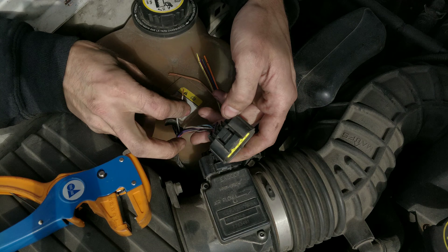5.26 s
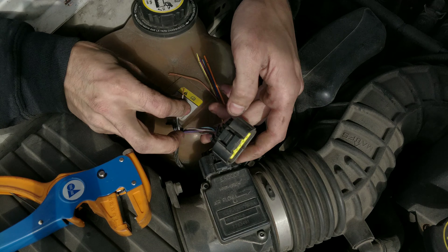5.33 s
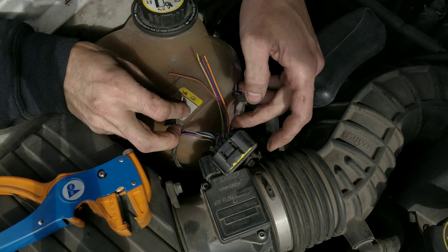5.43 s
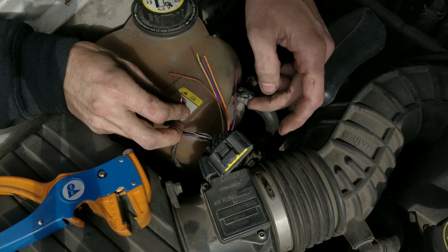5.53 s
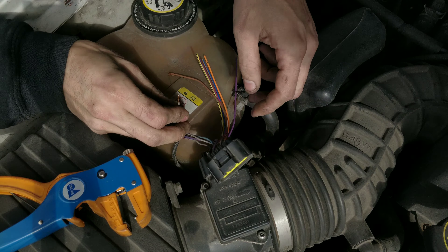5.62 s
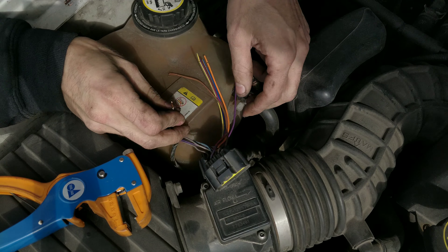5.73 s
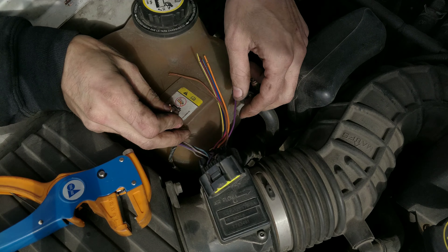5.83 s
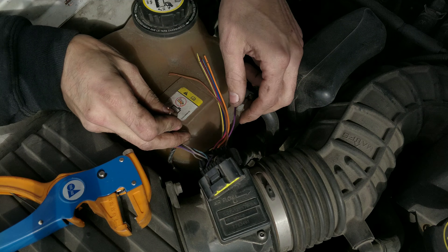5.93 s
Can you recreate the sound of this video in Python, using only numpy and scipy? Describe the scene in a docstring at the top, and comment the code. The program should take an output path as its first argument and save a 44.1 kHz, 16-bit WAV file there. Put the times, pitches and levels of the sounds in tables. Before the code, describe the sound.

An outdoor stereo scene by an open engine bay. A far engine drones low and nearly steady, wavering slightly and strengthening a little towards the end, within dull distant traffic leaning right. Fingers rustle faintly at the start. A short low wind thump hits the right side at 0.75 s, with weaker puffs until about 1.4 s. Close on the left, a wire cutter crunches and snaps loudly at 1.6 s. Small ticks follow around 1.7-2.05 s, then a bright snap with a brief steel ring at 2.29 s. At 2.53-2.6 s comes a fast, loud clatter of jaws and hollow plastic housing, with very short dull echoes. From 3 s only delicate, dry rubbing and tiny ticks remain, busier after 3.9 s. A barely audible thin squeak comes at 5.4 s, soft knocks and a damped metallic clink at 5.76-5.86 s, then a faint jingling drag to the end.

```python
"""Outdoors beside an open engine bay: from the start a far engine drones as three wavering sines
over the filtered noise of traffic, while fingers and sleeves rustle as grains of friction.
Wind puffs as low noise on one port; then, close on the left, a steel hand tool cuts and strips thin wire:
noise bursts make its jaws crunch, snap and tick, decaying modes let the plastic housing knock
and the steel ring. Late on the pivot squeaks as a thin tone and the dragged tool jingles."""
import sys
import numpy as np
from scipy import signal
from scipy.fft import rfft, irfft, next_fast_len
from scipy.io import wavfile

SR = 44100
rng = np.random.default_rng(int(sys.argv[2]) if len(sys.argv) > 2 else 0)


def decibels_to_gain(level_db):
    """Convert a level in decibels to a linear amplitude gain (20 dB per decade)."""
    exponent = np.asarray(level_db, float) / 20
    return 10 ** exponent


def store_wav(level_fs):
    """Save 16-bit WAV to argv[1]."""
    pcm = np.round(np.clip(np.atleast_2d(level_fs), -1, 1) * 32767)
    wavfile.write(sys.argv[1], SR, pcm.T.astype(np.int16))


N = 263277   # samples


def rms_one(x):
    """Scales a signal to a root mean square of 1."""
    return x / np.sqrt(np.mean(x ** 2) + 1e-20)


def in_time(rows):
    """Draws each column after the first as a line through time."""
    seconds, *columns = np.transpose(rows)
    return [np.interp(np.arange(N) / SR, seconds, column) for column in columns]


def coloured(x, points):
    """Shapes the spectrum by (Hz, dB) points, joined over log frequency."""
    size = next_fast_len(N)
    hz = np.maximum(np.arange(size // 2 + 1) * SR / size, 1)
    points_hz, points_db = np.transpose(points)
    gain_db = np.interp(np.log(hz), np.log(points_hz), points_db)
    return irfft(rfft(x, size) * decibels_to_gain(gain_db), size)[..., :N]


def drift(rate_hz):
    """Slow chance of spread 1: noise through two equal poles, drawn at every 40th sample."""
    r = np.exp(-2 * np.pi * rate_hz * 40 / SR)
    noise = rng.standard_normal(N // 40 + 2002)
    slow = signal.lfilter([1], [1, -2 * r, r * r], noise)[2000:]   # skip the settling
    return np.interp(np.arange(N) / 40, np.arange(len(slow)), rms_one(slow))


def ring(push, hz, t60):
    """A damped resonance: a unit click sets a sine ringing that falls 60 dB in t60 seconds."""
    r, w = decibels_to_gain(-60 / (t60 * SR)), 2 * np.pi * hz / SR
    return signal.lfilter([0, np.sin(w)], [1, -2 * r * np.cos(w), r * r], push + 1e-18)


def band(x, low_hz, high_hz):
    """Keeps the band between two frequencies."""
    return signal.sosfilt(signal.butter(2, [low_hz, high_hz], "band", fs=SR, output="sos"), x)


# The far engine, heard nearly level in both ports. Each row: time in seconds, firing rate in Hz,
# drone level in dB, third order level in dB, both before the waver.
ENGINE_COURSE = [(0, 69.58, -36, -55), (1.0, 68.8, -41.5, -59.5), (1.6, 68.76, -37.5, -56),
                 (2.3, 69.48, -33.5, -62.5), (2.8, 69, -37, -63.5), (3.5, 69.5, -33.5, -47.5),
                 (3.85, 69.4, -35, -64.5), (4.6, 69.1, -33.5, -48), (5.1, 70.13, -32.5, -54),
                 (5.3, 70.35, -29.5, -46.5), (5.97, 71.12, -31, -45.5)]


def engine():
    """Three firing orders as sines, the second swelling with the first; the air path makes each waver."""
    firing_hz, drone_db, third_db = in_time(ENGINE_COURSE)
    # the second order gains 1.9 dB per dB of drone
    second_db = -56 + 1.9 * (drone_db - drone_db.mean())
    phase = 2 * np.pi * np.cumsum(firing_hz) / SR
    drone = np.zeros(N)
    for order, level_db in enumerate([drone_db, second_db, third_db], start=1):
        waver = decibels_to_gain(.8 * drift(9))
        turn = .2 * drift(6)   # radians of firing phase
        drone += np.sqrt(2) * decibels_to_gain(level_db) * waver * np.sin(order * (phase + turn))
    return drone * decibels_to_gain([[.4], [-.4]])


# Traffic wash, far off. Each row: time in seconds, level of the 300-1500 Hz band in dB before its drift.
WASH_LEVEL = [(0, -49.5), (.3, -50), (1.2, -49), (2.0, -50.5), (2.9, -53), (4.1, -50), (5.97, -47)]
# Colour of the road noise at the microphone. Each row: frequency in Hz, relative level in dB per Hz.
ROAD_COLOUR = [(12, -32.5), (20, -15.5), (48, -7), (76, -6.5), (92, -10), (118, -13.5), (168, -19),
               (367, -27), (718, -24.5), (947, -25.5), (1140, -33), (1340, -32.5), (2030, -45), (5000, -59),
               (6500, -66.5), (11000, -120)]
# Noise from one side. Each row: frequency in Hz, share of the traffic power (kept within 0.01 and 0.99).
ONE_SIDED_SHARE = [(25, 0.71), (60, 1), (300, 0.98), (700, 0.77), (1500, .6), (4000, 0.074)]


def traffic():
    """Road noise: one part arrives from the right, reaching that port first, the rest from all around."""
    lag = 13.05   # samples by which the left port hears the road later
    one, left, right = rng.standard_normal((3, N))
    hz, share = np.transpose(ONE_SIDED_SHARE)
    share = np.clip(share, .01, .99)
    direct = coloured(one, np.c_[hz, 10 * np.log10(share)])
    around = coloured(np.array([left, right]), np.c_[hz, 10 * np.log10(1 - share)])
    lagged = np.interp(np.arange(N) - lag, np.arange(N), direct)
    wash = coloured(np.array([lagged, direct]) + around, ROAD_COLOUR)
    wash = wash / np.std(band(wash.mean(axis=0), 300, 1500))
    level_db = in_time(WASH_LEVEL)[0] + 0.49 * drift(0.97)
    return wash * decibels_to_gain(level_db) * decibels_to_gain([[.7], [-.7]])


# Microphone noise, at the ports themselves. Each row: frequency in Hz, relative level in dB per Hz.
HISS_COLOUR = [(1500, -10.5), (4000, -2.5), (8000, -7), (12000, -6.5), (16000, -3)]


def hiss():
    """Each microphone port adds coloured noise of its own."""
    return decibels_to_gain(-67) * rms_one(coloured(rng.standard_normal((2, N)), HISS_COLOUR))


# Fingers and sleeves rubbing close to the left port. Each row: start in seconds, loudest in seconds,
# end in seconds, fine hiss in dB, coarse scuff in dB.
RUB_STROKES = [(-.3, 0, 0.5, -64, -66.5), (0.497, .62, .8, -70, -75), (2.002, 2.06, 2.33, -75, -66),
               (2.25, 2.401, 2.52, -65, -66), (2.461, 2.51, 2.55, -53, -50), (3.03, 3.08, 3.1, -67, -71.5),
               (3.201, 3.3, 3.38, -67.5, -72), (3.88, 3.927, 3.97, -61, -64), (4.02, 4.057, 4.11, -59, -63),
               (4.278, 4.31, 4.35, -60, -61), (4.366, 4.46, 4.53, -58, -63), (4.579, 4.76, 4.81, -61, -65),
               (4.799, 4.822, 4.84, -48.5, -57.5), (4.889, 4.93, 5.16, -56.5, -65.5),
               (5.202, 5.3, 5.36, -58, -61.5), (5.323, 5.39, 5.44, -57, -60.5),
               (5.571, 5.6, 5.63, -60.5, -68), (5.64, 5.68, 5.73, -59, -68),
               (5.8, 5.936, 6.1, -58.5, -59.5)]


def rustle():
    """Dense tiny grains of friction, fine and coarse, in uneven clumps; strokes swell out of a faint rest."""
    t = np.arange(N) / SR
    power = np.ones(N) * decibels_to_gain([[-73.5], [-72.5]]) ** 2   # hands at rest: fine, coarse
    for start, loudest, end, fine_db, coarse_db in RUB_STROKES:
        swell = np.interp(t, np.sort([start, loudest, end]), [0, 1, 0])
        power = power + swell ** 1.5 * decibels_to_gain([[fine_db], [coarse_db]]) ** 2
    grain_db = 1.5 * rng.exponential(1, (2, N))
    clump_db = 2.0 * drift(30)
    grains = rng.standard_normal((2, N)) * decibels_to_gain(grain_db + clump_db)
    fine_colour = [(8000, -30), (10500, -7), (13000, 0), (15200, -2), (16200, -25)]   # Hz, dB
    fine = rms_one(coloured(grains[0], fine_colour))
    coarse = rms_one(band(grains[1], 3500, 7100))
    return (np.array([fine, coarse]) * np.sqrt(power)).sum(axis=0)


# Puffs of wind at the microphone. Each row: time of the peak in seconds, length in seconds,
# level in dB, port (0 left, 1 right).
WIND_PUFFS = [(0.753, 0.064, -22.5, 1), (0.923, 0.15, -34.5, 1), (1.11, 0.14, -38, 0), (1.31, 0.52, -36, 0)]


def wind():
    """Each puff is lumpy rumble under a bell-shaped swell, on one port only."""
    out, t = np.zeros((2, N)), np.arange(N) / SR
    colour = [(8, -0.5), (22, 7.5), (45, -7.5), (250, -24.5), (500, -68.5)]   # Hz, dB
    rumble = rms_one(coloured(rng.standard_normal(N), colour))
    for peak, length, level_db, port in WIND_PUFFS:
        swell = np.exp(-((t - peak) / (0.56 * length)) ** 2)
        out[int(round(port))] += decibels_to_gain(level_db) * rumble * swell
    return out


# Short modes of the tool's jaws. Each row: frequency in Hz, relative level in dB, time to fall 60 dB in seconds.
JAW_MODES = [(2250, 3, .016), (3350, 1, .018), (4237, -8, .012), (4818, -9, .012), (5663, -5, .008),
             (6600, -9, .008), (11300, -8, .005), (12900, -3, .005), (14400, -5, .004)]


def jaws(push, bright_db, best_hz):
    """The push rings short jaw modes, strongest near best_hz, with a broad crack between them."""
    low_modes, high_modes = 0, 0
    for hz, level_db, t60 in JAW_MODES:
        mode = decibels_to_gain(level_db + rng.normal(0, 1.5)) * ring(push, hz, t60)
        if hz < 9000:
            low_modes = low_modes + mode * decibels_to_gain(-20 * np.log2(hz / best_hz) ** 2)
        else:
            high_modes = high_modes + mode
    low_crack = band(band(push, best_hz / 1.8, best_hz * 1.6), best_hz / 1.8, 9700)
    treble_push = push * decibels_to_gain(-900 * np.arange(len(push)) / SR)   # treble dies sooner
    high_crack = band(treble_push, 10740, 15900)
    low = low_modes / np.abs(low_modes).max() + 1.2 * low_crack / np.abs(low_crack).max()
    high = high_modes / np.abs(high_modes).max() + 2.4 * high_crack / np.abs(high_crack).max()
    return low + decibels_to_gain(bright_db) * high


# Blades biting into the wire, close by. Each row: start in seconds, end in seconds, strength in dB.
WIRE_BITES = [(1.598, 1.6065, -19), (2.279, 2.285, -32)]


def bites():
    """The blades crunch into the wire before it parts: noise growing by 12 dB drives the jaws."""
    out, t = np.zeros(N + 4096), np.arange(4096) / SR
    for start, end, strength_db in WIRE_BITES:
        length = end - start
        growth = decibels_to_gain(-12 * (length - t) / length) * (t < length)
        crunch = rng.standard_normal(4096) * growth
        at = round(start * SR)
        out[at:at + 4096] += decibels_to_gain(strength_db) * jaws(crunch, -9.5, 3500)
    return out[:N]


# Hard contacts of jaws, wire and housing, close by. Each row: time in seconds, strength in dB,
# brightness in dB (before a common lift of 3 dB), best excited frequency in Hz.
HARD_CONTACTS = [(1.6064, -4, -7.5, 3147), (1.711, -53, 3, 5500), (1.891, -46.5, -11, 4400),
                 (2.0228, -39.5, -23, 5200), (2.037, -41, -9, 4800), (2.0498, -31, -9.5, 5500),
                 (2.2851, -14.5, -1.5, 3860), (2.5336, -11, 0.5, 3860), (2.550, -17, -4, 4300),
                 (2.5727, -13, -1.5, 3940), (2.584, -19, 1, 3900), (2.602, -28.5, -6, 4000),
                 (3.252, -58, 6, 5500), (3.926, -48, -6, 4200), (3.979, -46.5, 10, 5600),
                 (4.017, -55.5, 13, 4800), (4.056, -46.5, 6, 4980), (4.067, -48, 8, 5015),
                 (4.211, -52.5, -1, 5600), (4.307, -45, 8, 5020), (4.809, -53, 11, 5570),
                 (4.843, -48.5, 7.5, 5570), (5.192, -54, 7, 6050), (5.284, -45, -11, 4500),
                 (5.760, -44.5, -12, 5200), (5.851, -32, -24.5, 5550)]


def ticks():
    """Each contact is a click with a dying chatter behind it, longer for harder blows, driving the jaws."""
    out, t = np.zeros(N + 4096), np.arange(4096) / SR
    for start, strength_db, bright_db, best_hz in HARD_CONTACTS:
        t60 = .03 + 0.0003 * strength_db
        chatter = rng.standard_normal(4096) * decibels_to_gain(-60 * t / t60 - 13.5)
        chatter[0] += 1
        at = round(start * SR)
        out[at:at + 4096] += decibels_to_gain(strength_db) * jaws(chatter, bright_db + 3.0, best_hz)
    return out[:N]


# Tool knocks on the housing, close by. Each row: time in seconds, strength in dB.
HOUSING_KNOCKS = [(1.6056, -34.5), (2.2838, -50), (2.534, -1.5), (2.550, -20), (2.5728, -2.5), (2.5841, -8),
                  (2.603, -14), (2.626, -30), (5.764, -33), (5.85, -28)]
# Modes of the plastic housing. Each row: frequency in Hz, relative level in dB, time to fall 60 dB in seconds.
HOUSING_MODES = [(200, -9, .06), (295, 5.5, .065), (375, -1, .055), (590, -4, .045), (690, -3, .04),
                 (775, -7, .035), (915, -4, .035), (1240, -6, .03), (1350, -1, .035)]


def knocks():
    """Each knock strikes every housing mode, unlike at each port, and rattles the shell broadly."""
    at, out = [round(s * SR) for s, _ in HOUSING_KNOCKS], np.zeros((2, N))
    blows = np.zeros(N)
    blows[at] = decibels_to_gain(np.array(HOUSING_KNOCKS)[:, 1])
    for hz, level_db, t60 in HOUSING_MODES:
        shared_db = rng.normal(0, 1.5, len(at))
        port_db = rng.normal(0, 1.5, (2, len(at)))
        clicks = np.zeros((2, N))
        clicks[:, at] = -blows[at] * decibels_to_gain(level_db + shared_db + port_db) / np.sqrt(len(HOUSING_MODES))
        out += ring(clicks, hz, t60)
    dying = signal.lfilter([1], [1, -decibels_to_gain(-60 / (0.044 * SR))], blows + 1e-18)   # 60 dB in 0.044 s
    rattle = band(dying * rng.standard_normal((2, N)), 160, 1420)
    out = out + decibels_to_gain(6.5) * (0.2 * rattle + 0.38 * rattle[0])   # the second part is common to both ports
    # the small shell radiates little below 210 Hz
    return signal.sosfilt(signal.butter(2, 210, "high", fs=SR, output="sos"), out)


def bay(x):
    """A scatter of short dull echoes off the engine bay, other ones per side."""
    t = np.arange(4096) / SR
    tail = rng.standard_normal((2, 4096)) * decibels_to_gain(-60 * t / 0.049 - 37.5) * (t > .002)
    return band(signal.fftconvolve(x[None], tail, axes=1)[:, :N], 150, 7000)


# Blows that leave the steel ringing, close by. Each row: time in seconds, strength in dB,
# best excited frequency in Hz, share of the free ring time left by the grip.
STEEL_BLOWS = [(2.288, -29, 3350, 1), (2.586, -46, 3750, 0.87), (3.33, -48.5, 1400, 0.94),
               (5.851, -32.5, 2500, 0.4), (5.854, -28, 4900, 0.4), (5.862, -34.5, 1400, 0.67)]
# Modes of the free steel. Each row: frequency in Hz, relative level in dB, time to fall 60 dB in seconds.
STEEL_MODES = [(1400, 0, .13), (2480, -3, .25), (3682, 0, .22), (3876, -4, .09), (4470, -10, .1),
               (4640, -10, .09), (5640, -12, .12), (6600, -12, .1)]


def steel():
    """Where the blow lands decides which modes sing: strength falls with octaves from the best excited one."""
    out = np.zeros(N)
    click = np.eye(1, 16384)[0]
    for start, blow_db, best_hz, free in STEEL_BLOWS:
        at = round(start * SR)
        for hz, level_db, t60 in STEEL_MODES:
            gain = decibels_to_gain(blow_db + level_db - 39 * abs(np.log2(hz / best_hz)))
            tone = ring(click, hz, t60 * np.clip(free, .1, 1))
            out[at:at + len(click)] += gain * tone[:N - at]
    return out


def squeak():
    """The pivot rubs: a thin tone that throbs as the joint slips."""
    start, end = 5.362, 5.432   # s
    hz, level_db = 3790, -62
    t = np.arange(N) / SR
    fade = np.clip(np.minimum(t - start, end - t) / .006, 0, 1)
    throb = decibels_to_gain(level_db + 3 * drift(25))
    return fade * throb * np.sin(2 * np.pi * hz * t)


def slide():
    """The tool is dragged: uneven small bumps keep the held steel jingling, its upper modes most."""
    start, level_db, bumps_per_s = 5.885, -65, 400
    happens = rng.random(N) < bumps_per_s / SR
    bumps = happens * rng.standard_normal(N) * (np.arange(N) > start * SR)
    jingle = np.zeros(N)
    for hz, _, t60 in STEEL_MODES:
        jingle += hz / STEEL_MODES[-1][0] * ring(bumps, hz, t60 / 9)   # the hold shortens the ring
    return decibels_to_gain(level_db) * jingle


# Dip in the microphone housing. Each row: frequency in Hz, gain in dB.
PORT_DIP = [(7900, 0), (8800, -13), (9800, 0)]
# Right port for a source close on the left. Each row: frequency in Hz, gain in dB.
BODY_SHADOW = [(300, -4.5), (700, 2), (1300, -2.5), (2400, -10.5), (4400, -19.5), (8000, -21), (15000, -32)]


def scene():
    """Hands and tool close on the left, with the road, engine and wind added around them."""
    tool = bites() + ticks() + steel() + squeak() + slide()
    blows = coloured(tool, PORT_DIP) + knocks()
    near = blows + rustle() + bay(blows[0])
    hands = np.array([near[0], coloured(near[1], BODY_SHADOW)])   # the camera body shades the right port
    return hands + traffic() + engine() + wind()


def roll_off(x):
    """The treble ends steeply here."""
    return signal.sosfilt(signal.butter(12, 16690, fs=SR, output="sos"), x)


def record(dry):
    """The ports add their hiss, peaks are rounded and the top is cut."""
    rounded = 1.12 * np.tanh((dry + hiss()) / 1.265)
    top_cut = signal.cheby2(10, 60, 16600, fs=SR, output="sos")
    mix = signal.sosfilt(top_cut, rounded)
    return roll_off(mix)


dry = scene()
out = record(dry)
store_wav(out)
```